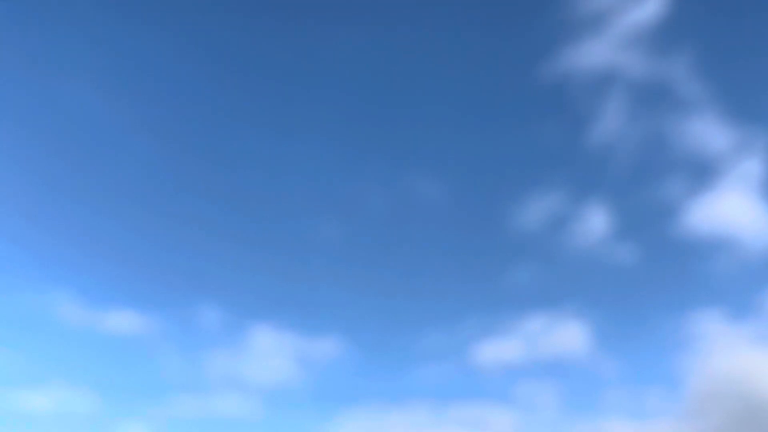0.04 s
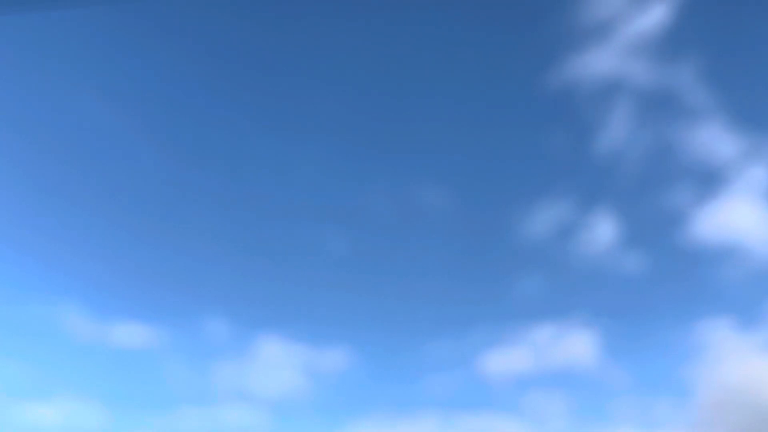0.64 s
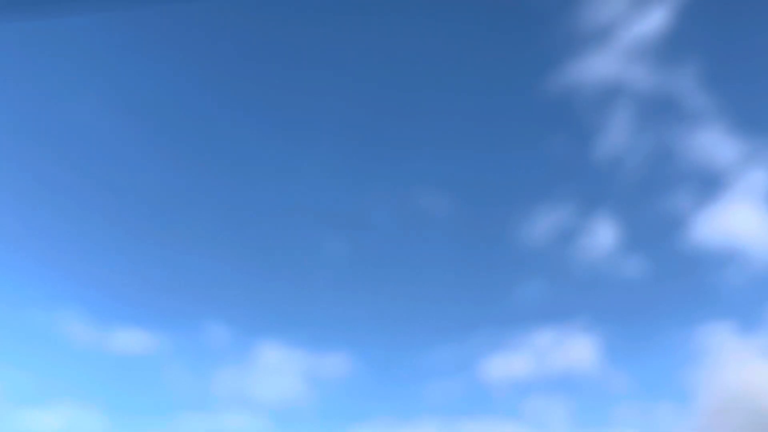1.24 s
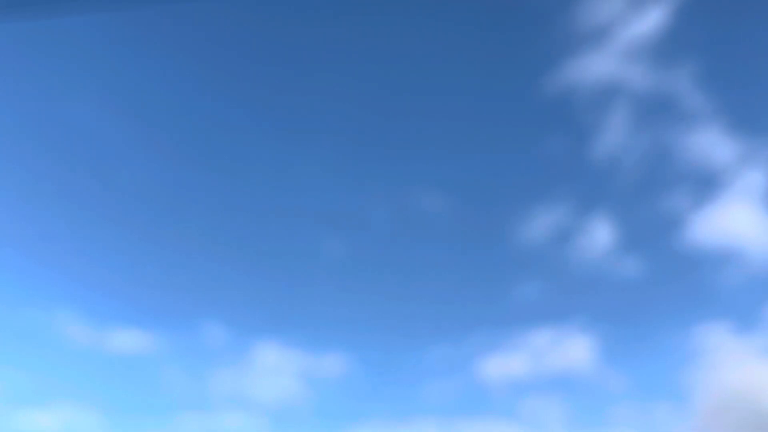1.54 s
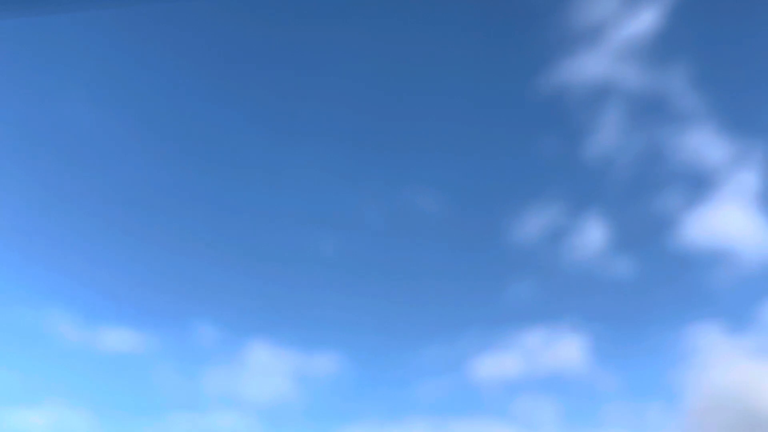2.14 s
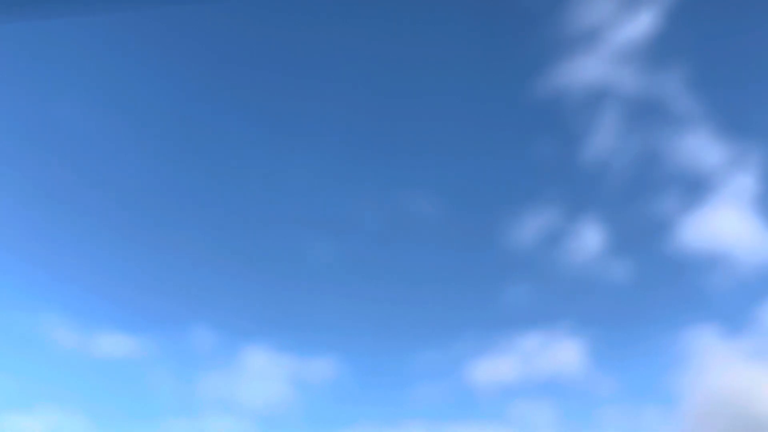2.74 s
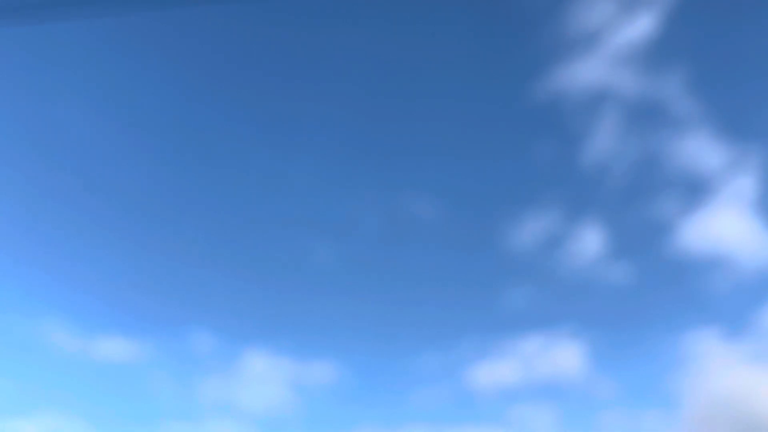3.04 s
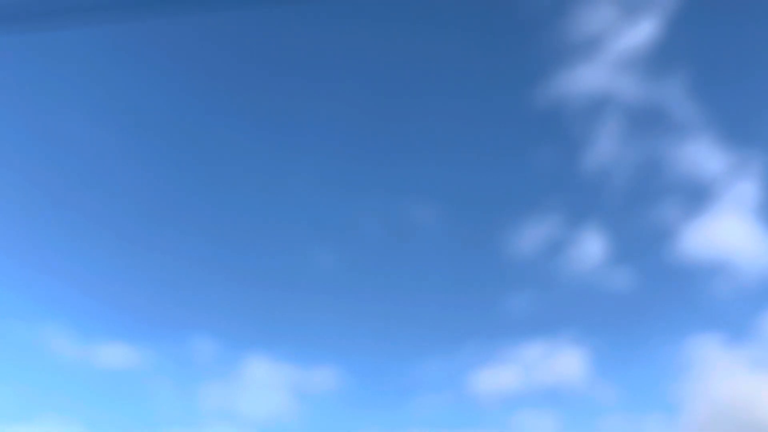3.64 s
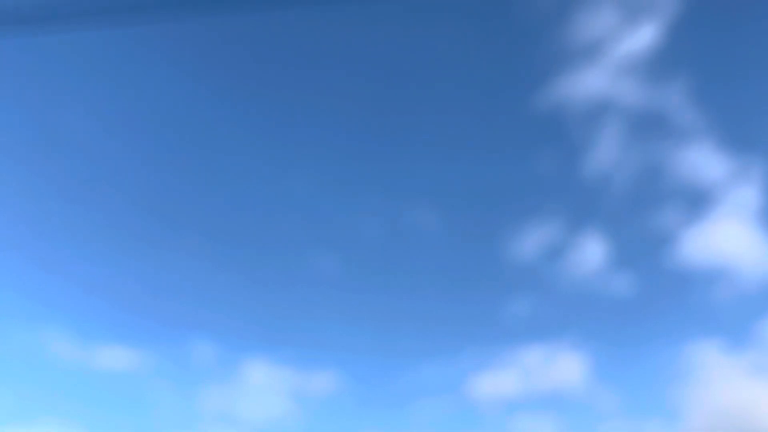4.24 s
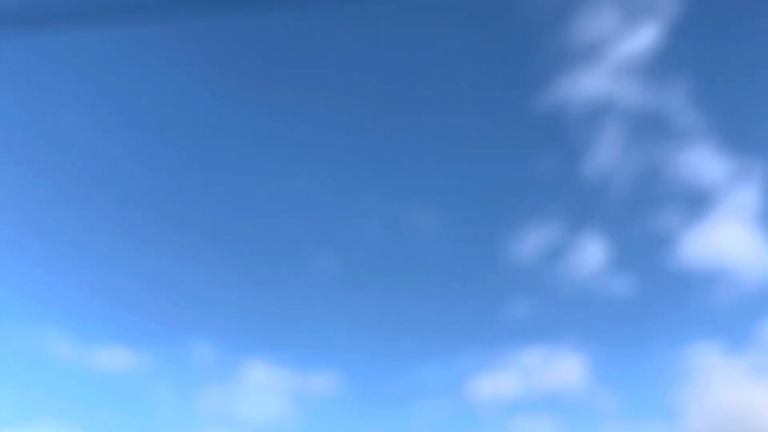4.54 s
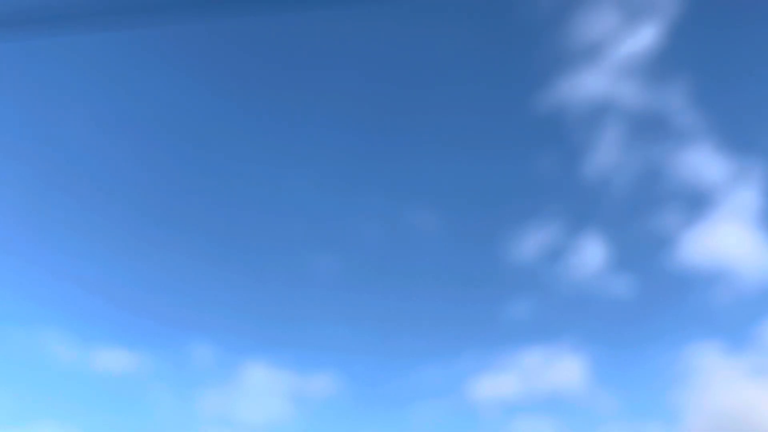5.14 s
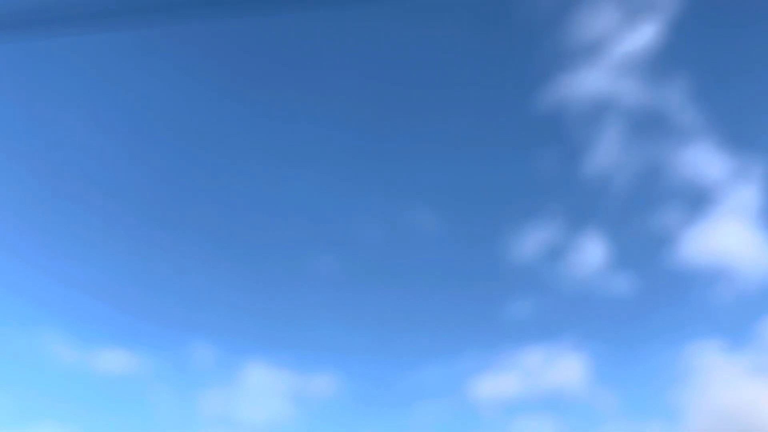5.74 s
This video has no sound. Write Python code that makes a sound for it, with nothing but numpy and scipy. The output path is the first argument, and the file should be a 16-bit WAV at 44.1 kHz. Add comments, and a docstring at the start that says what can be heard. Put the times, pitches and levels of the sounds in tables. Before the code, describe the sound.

A military jet roars high over open ground, heard from far below in stereo. It starts with a tearing rush over a deep, buffeting rumble, then grows quieter and duller as it draws away. In the second half the roar swells and brightens again, with a hollow, throbbing boom as the aircraft turns. Close to the microphones are a few faint rustles, small ticks and three barely audible bird peeps.

```python
"""Fighter jet high over open ground

Heard from a pair of microphones far below, the roar recedes, then swells as the exhaust swings round.
The plume's large eddies give a buffeting rumble and a hollow boom; its fine turbulence gives a tearing
roar whose treble the air soaks up with distance. Close by, over a faint outdoor hiss, there are
a few ticks and rustles, and a small bird calls three times."""
import sys
import numpy as np
from scipy import signal
from scipy.fft import rfft, irfft, next_fast_len
from scipy.io import wavfile
from scipy.ndimage import uniform_filter1d

SR = 44100
rng = np.random.default_rng(int(sys.argv[2]) if len(sys.argv) > 2 else 0)


def wav_record(signal):
    """Record a signal, one row per channel, as 16-bit PCM in the file named by sys.argv[1]."""
    frames = np.transpose(np.atleast_2d(signal))
    bounded = np.clip(frames, -1, 1)
    # unit amplitude maps onto the largest positive 16-bit level
    quanta = np.round(bounded * 32767).astype(np.int16)
    wavfile.write(sys.argv[1], SR, quanta)


N = 259749
TIME = np.arange(N) / SR
FFT_SIZE = next_fast_len(N, True)
BINS_HZ = np.maximum(np.arange(FFT_SIZE // 2 + 1) * SR / FFT_SIZE, 1)
MIC_SIDES = np.array([[1], [-1]])   # left, right

# Levels in the tables are relative: each source applies its own gain on top.
# how alike the scattered sound is at the two microphones: freq_hz, correlation
MIC_LIKENESS = [(40, .985), (100, .95), (200, .87), (310, .78), (400, .45), (520, .05), (800, -.1),
                (1300, -.15), (2200, 0), (8000, 0)]
# left microphone against right: freq_hz, balance_db
MIC_BALANCE = [(50, -1), (130, -1.5), (190, -2.5), (370, 0.5), (600, 0.5), (1000, 0.8), (1500, 2.5),
               (2200, 5.5), (2700, 0.5), (5000, 5), (7000, 3.5), (9000, -0.5)]
# how far the scattered sound leads at the left microphone: freq_hz, phase_rad
MIC_LEAD = [(60, 0.021), (170, 0.44), (310, .85), (600, .6), (1500, 0.56)]
# power that comes straight from the aircraft: freq_hz, share (0-1)
DIRECT_SHARE = [(300, .01), (600, .1), (900, .38), (1300, .48), (2000, .33), (2700, .18), (3300, .12),
                (4500, .25), (6000, .3)]
# echoes off surfaces near the microphones: delay_ms, level_db
NEARBY_ECHOES = [(7.9, -17.5), (10.8, -24), (18.6, -12.5), (27.4, -15), (43, -18.5)]

# spectrum of the outdoor hiss: freq_hz, level_db
AIR_SPECTRUM = [(100, -14), (1000, -3.5), (3500, -5.5), (4800, -5.5), (5700, -8), (6450, -6.5),
                (7500, -13.5), (8500, -14.5), (10000, -18.5), (12000, -33)]
# bird calls: start_s, length_s, top_pitch_hz, level_db
BIRD_CALLS = [(1.94, 0.059, 3600, -68.5), (2.962, .06, 3650, -76), (3.996, 0.085, 3620, -71)]
# soft rustles close by: centre_s, length_s, level_db
RUSTLE_EVENTS = [(0.006, .1, -50), (0.353, 0.12, -58), (3.06, 0.054, -74)]
# spectrum of a rustle: freq_hz, level_db
RUSTLE_SPECTRUM = [(2000, -5), (4000, -9.5), (5500, -14), (6300, -11.5), (7400, -26), (8300, -17.5),
                   (9500, -33)]
# small dry ticks close by: start_s, level_db
TICK_EVENTS = [(1.4626, -62), (1.6245, -66), (1.6985, -57), (1.7575, -61), (1.884, -68), (1.9555, -62),
               (5.643, -50), (5.654, -42)]
# resonances of the thing that ticks: freq_hz, width_hz, level_db
TICK_RESONANCES = [(4000, 640, 4), (6200, 320, 8), (8250, 450, -3.5)]

# spectrum of the very lowest rumble: freq_hz, level_db
DEEP_SPECTRUM = [(20, -24.5), (30, -15), (38, -2.5), (48, 0.5), (58, -10.5)]
# spectrum of the buffeting rumble: freq_hz, level_db
RUMBLE_SPECTRUM = [(22, -51), (32, -28), (42, -11), (52, -1.5), (68, 5), (82, 1.5), (98, 0), (118, -16.5),
                   (160, -41)]
# the largest eddies swell the low end: centre_s, length_s, rumble_lift_db, boom_lift_db
EDDY_BILLOWS = [(0.074, 0.1, -2, -0.5), (0.44, 0.088, 2, 6), (.54, 0.039, 6, 2.5), (0.893, 0.16, 3, 2.5),
                (1.321, 0.047, -6, 6), (1.506, 0.15, 3.5, -1), (1.73, 0.097, 3, 3), (2.928, 0.058, 4, 2),
                (3.702, 0.39, 4.5, 1.5), (4.018, 0.045, 8.5, -0.5), (4.22, 0.16, 4.5, 1),
                (4.967, 0.041, 7, -1), (5.413, 0.19, 3, 0)]
# low notes in the rumble: centre_s, length_s, pitch_hz, level_db
MOAN_NOTES = [(0.094, 0.1, 99, -19), (0.905, 0.084, 68, -22), (1.324, 0.052, 128, -22.5),
              (3.754, 0.22, 69, -33), (4.514, 0.28, 69.5, -23), (5.124, .14, 67, -26.5),
              (5.422, 0.3, 70, -21)]
# single heavy puffs of the plume: start_s, level_db
PLUME_PUFFS = [(0.01, -15.5), (0.055, -10.5), (0.083, -17), (0.445, -19.5), (0.535, -19), (0.632, -13),
               (0.9, -16), (1.183, -15), (1.297, -16), (1.396, -16), (1.461, -23), (3.782, -18),
               (4.028, -23), (5.487, -7)]
# resonances that shape a puff: freq_hz, width_hz, level_db
PUFF_RESONANCES = [(84, 57, -3), (124, 45, -5)]

# spectrum of the boom: freq_hz, level_db
BOOM_SPECTRUM = [(70, -41.5), (100, -9), (118, 0), (140, 1.5), (165, -1.5), (190, -1.5), (215, -7),
                 (255, -2.5), (295, -10.5), (380, -18)]
# the boom rings between ground and walls: freq_hz, width_hz, level_db
HOLLOW_RESONANCES = [(73.3, 2.5, -8), (140.2, 13, -4.5), (254.7, 7, -12.5)]
# the boom swells as the exhaust points at the microphones: time_s, level_db
EXHAUST_AIM = [(0, -19), (.22, -27), (.5, -27), (1.2, -28), (1.6, -33.5), (2.1, -33), (2.6, -36.5),
               (3.45, -34.5), (4.1, -30), (4.55, -21), (4.85, -20.5), (5.45, -15.5), (5.89, -20)]
# a drone in the boom climbs as the aircraft comes round: time_s, level_db, pitch_hz
BOOM_DRONE = [(2.0, -12, 165.2), (3.0, -7.5, 165), (4.25, -2, 171.9), (4.42, -2, 188), (4.55, 2.5, 187.8),
              (4.85, -5.5, 185.1), (4.95, -6, 171.8), (5.12, -1.5, 174.6), (5.35, 1.5, 179.9),
              (5.55, 2, 183.2), (5.89, -2, 187)]
# the upper boom opens, longest at the far end of the turn: centre_s, length_s, lift_db
BOOM_OPENINGS = [(1.15, 0.19, 7), (2.68, 0.65, 12.5), (3.55, 0.51, 2.5), (5.33, 0.19, 7.5), (5.72, 0.2, 3)]

# spectrum of the roar: freq_hz, level_db
ROAR_SPECTRUM = [(200, -34.5), (310, 2), (390, -1), (500, -1.6), (630, 0), (790, -4.5), (1040, -4.5),
                 (1300, -10), (1900, -15), (2450, -18.5), (3100, -28.5), (4400, -34), (5500, -43.5),
                 (6250, -40.5), (7300, -55), (10000, -63)]
# the roar as the jet draws away and returns: time_s, level_db, air_loss_db (at 2.4 kHz), treble_lift_db
FLIGHT_PATH = [(0, -21, -0.5, 4.5), (.17, -25.5, 1.4, 2), (.35, -25.5, 1.5, 3.5), (.6, -26.5, 2, 1),
               (.88, -28, 3, 3.5), (1.35, -29.5, 7, 3.5), (1.9, -35, 9.5, 3), (2.28, -35.5, 12.5, 5),
               (2.55, -34.5, 12.5, 5.5), (3.1, -33, 12, 3), (4.1, -31, 9, 0), (4.6, -28.5, 5.5, 0.5),
               (4.95, -27, 5.5, 2), (5.2, -26, 3, 2), (5.52, -24, 1.55, 2.5), (5.89, -24, 2.5, 2.5)]
# the roar surges as the air on its path shifts: centre_s, length_s, lift_db
ROAR_SURGES = [(.05, 0.12, -1.5), (.27, 0.13, 1.5), (.86, 0.12, 0.5), (2.55, 0.25, 1.5), (3.07, 0.14, 1.2),
               (5.53, 0.078, 0.9)]
# churning bands of the roar: centre_hz
CHURN_BANDS = [340, 527, 784]
# hollow colours roll through the roar: centre_s, length_s, lift_db, centre_hz
ROAR_ROLLS = [(.25, .45, 1.5, 323), (0.967, 0.22, 2.5, 1034), (1.278, 0.19, 1, 510), (3.1, 0.14, 4, 1000),
              (3.45, 0.32, 0.5, 1010), (3.68, 0.53, 1, 608.2), (5.253, 0.44, 6, 419), (5.524, 0.16, 7, 720),
              (5.53, 0.21, -0.5, 1000), (5.794, .2, 0.5, 660)]


def from_db(db):
    """Decibels to gain."""
    return 10 ** (np.asarray(db) / 20)


def unit_power(x):
    """Scale to an RMS of 1."""
    return x / np.sqrt(np.mean(x ** 2) + 1e-20)


def in_time(rows):
    """Each column of a curve at every sample."""
    times, *columns = np.transpose(rows)
    return [np.interp(TIME, times, column) for column in columns]


def at_hz(points, hz=BINS_HZ):
    """Read a table on a log-frequency axis."""
    freqs, values = np.transpose(points)
    return np.interp(np.log(hz), np.log(freqs), values)


def hump(centre_s, length_s):
    """A smooth rise and fall of height 1."""
    return np.exp(-(2 * (TIME - centre_s) / length_s) ** 2)


def swells(rows):
    """The summed lift in dB of rows of centre_s, length_s, lift_db."""
    return sum(db * hump(s, length) for s, length, db in rows)


def strikes(events):
    """One click per row of start_s, level_db."""
    clicks = np.zeros(N)
    for s, db in events:
        clicks[round(s * SR)] = from_db(db)
    return clicks


def drift(rate_hz, step=16):
    """A smooth random wander with an RMS of 1, mostly slower than rate_hz."""
    count = next_fast_len(N // step + 2, True)
    hz = np.arange(count // 2 + 1) * SR / step / count
    slow = irfft(rfft(rng.standard_normal(count)) / (1 + (hz / rate_hz) ** 2), count)
    return unit_power(np.interp(np.arange(N) / step, np.arange(count), slow))


def colour(spectrum):
    """Gain per frequency, falling steeply beyond the ends of the spectrum."""
    skirts = np.minimum(BINS_HZ / spectrum[0][0], 1) * np.minimum(spectrum[-1][0] / BINS_HZ, 1)
    return from_db(at_hz(spectrum)) * skirts ** 5


def resonances(modes):
    """Complex gain per frequency of parallel resonances: freq_hz, width_hz, level_db."""
    return sum(from_db(db) / (1 + 1j * (BINS_HZ - hz ** 2 / BINS_HZ) / width) for hz, width, db in modes)


def filtered(x, gain):
    """Apply a gain per frequency."""
    return irfft(rfft(x, FFT_SIZE) * gain, FFT_SIZE)[..., :N]


def band(x, hz, q):
    """One resonant band, hz / q wide."""
    return filtered(x, resonances([(hz, hz / q, 0)]))


def low_cut(x, hz):
    """Steep high-pass."""
    return signal.sosfilt(signal.butter(4, hz, "high", fs=SR, output="sos"), x)


def tilted(x, upper_db, split_hz):
    """Raise or lower everything above a split frequency, moment by moment."""
    low = filtered(x, 1 / (1 + (BINS_HZ / split_hz) ** 8))
    return low + from_db(upper_db) * (x - low)


def steadied(x, samples):
    """Even out the slow swells of a noise and keep its fast buffeting."""
    power = np.mean(x ** 2, axis=0)
    slow_power = uniform_filter1d(uniform_filter1d(power, samples), samples)
    return x / np.sqrt(slow_power + 1e-12)


def mic_gains(hz=BINS_HZ):
    """Gain at the left and right microphones."""
    return from_db(MIC_SIDES * at_hz(MIC_BALANCE, hz) / 2)


def outdoor_noise(gain, left_lag_s=0.00042):
    """Noise at both microphones: a direct wave from the right, plus scatter from the surroundings."""
    direct, mid, side = rfft(rng.standard_normal((3, FFT_SIZE)))
    share, alike = at_hz(DIRECT_SHARE), at_hz(MIC_LIKENESS)
    direct = np.sqrt(share) * direct * np.exp(-2j * np.pi * BINS_HZ * MIC_SIDES * left_lag_s / 2)
    scattered = np.sqrt((1 + alike) / 2) * mid + np.sqrt((1 - alike) / 2) * side * MIC_SIDES
    scattered = np.sqrt(1 - share) * scattered * np.exp(1j * MIC_SIDES * at_hz(MIC_LEAD) / 2)
    return unit_power(irfft((direct + scattered) * gain * mic_gains(), FFT_SIZE)[:, :N])


def open_air(level_db=-71.5):
    """The faint hiss of open ground; its level and treble flicker slightly."""
    gain = from_db(level_db + .4 * drift(15))
    hiss = outdoor_noise(colour(AIR_SPECTRUM))
    return gain * tilted(hiss, .8 * drift(12), split_hz=4800)


def bird(bend=.085):
    """A small bird nearby: thin, slightly rough peeps that arch up to their top pitch."""
    calls = np.zeros(N)
    quaver = .014 * drift(300)
    for s, length, top_hz, db in BIRD_CALLS:
        progress = np.clip((TIME - s) / length, 0, 1)
        pitch_hz = top_hz * (1 - bend * (progress / .55 - 1) ** 2 + quaver)
        calls += from_db(db) * np.sin(np.pi * progress) * np.sin(2 * np.pi * np.cumsum(pitch_hz) / SR)
    return calls


def rustles(grain_db=2.5):
    """Short grainy swishes close to the microphones."""
    envelope = sum(from_db(db) * hump(s, length) for s, length, db in RUSTLE_EVENTS)
    return envelope * from_db(grain_db * drift(120)) * outdoor_noise(colour(RUSTLE_SPECTRUM))


def ticks(gain_db=13.0, scuff_db=-14, scuff_s=0.0024):
    """Close by, a contact and a brief scuff ring a small hard thing for a few milliseconds."""
    clicks = strikes(TICK_EVENTS)
    decays = signal.lfilter([1], [1, -np.exp(-1 / (scuff_s * SR))], clicks + 1e-18)
    scuffs = from_db(scuff_db) * decays * rng.standard_normal(N)
    ringing = sum((-1) ** k * resonances([mode]) for k, mode in enumerate(TICK_RESONANCES))
    return from_db(gain_db) * filtered(clicks + scuffs, ringing)


def deep_rumble(level_db=-43):
    """The very lowest rumble carries evenly to the ground, whichever way the exhaust points."""
    return from_db(level_db) * steadied(outdoor_noise(colour(DEEP_SPECTRUM)), samples=8000)


def moans(waver_hz=1.72):
    """Now and then the rumble gathers into one low, wavering note."""
    notes = 0
    for s, length, hz, db in MOAN_NOTES:
        phase = 2 * np.pi * (rng.random() + np.cumsum(hz + waver_hz * drift(8.6)) / SR)
        notes = notes + from_db(db) * mic_gains(hz) * hump(s, length) * unit_power(np.sin(phase))
    return notes


def thumps(gain_db=-1.5, soft_hz=170):
    """A heavy eddy reaches the microphones as a soft pressure pulse of a cycle or two."""
    body = resonances(PUFF_RESONANCES) / (1 + 1j * BINS_HZ / soft_hz) ** 3
    body /= np.abs(irfft(body, FFT_SIZE)).max()
    pulses = filtered(strikes(PLUME_PUFFS), body)
    return from_db(gain_db) * mic_gains(100) * low_cut(pulses, hz=42)


def rumble(aim_db, air_loss_db, base_db=-29.5, buffet_db=0.5):
    """The plume's large eddies arrive in lumps, deepest while the aircraft is far off."""
    lift_db = 2.5 - 0.93 * air_loss_db
    eddies = outdoor_noise(colour(RUMBLE_SPECTRUM))
    eddies = tilted(eddies, lift_db, split_hz=140)
    eddies = tilted(eddies, lift_db, split_hz=51)
    billow_db = swells((s, length, db) for s, length, db, _ in EDDY_BILLOWS)
    level_db = base_db + .3 * aim_db + billow_db + buffet_db * drift(12)
    return low_cut(from_db(level_db) * steadied(eddies, samples=3000), hz=44)


def drone(waver_hz=0.9, throb_db=3.4):
    """A throbbing note in the boom that climbs as the aircraft comes round."""
    level_db, pitch_hz = in_time(BOOM_DRONE)
    phase = 2 * np.pi * np.cumsum(pitch_hz + waver_hz * drift(12)) / SR
    tone = np.sin(phase + MIC_SIDES * at_hz(MIC_LEAD, pitch_hz) / 2) * mic_gains(pitch_hz)
    return from_db(level_db) * unit_power(tone * from_db(throb_db * drift(19)))


def boom(boom_db, aim_db, surge_db=0.95):
    """The boom rings hollow and gathers into a drone when the exhaust points at the microphones."""
    low_band = np.abs(resonances([(122, 310, 0)])) ** 2
    hollow = from_db(-11 + 0.71 * aim_db) * outdoor_noise(resonances(HOLLOW_RESONANCES) * low_band)
    blend = hollow + drone() + outdoor_noise(colour(BOOM_SPECTRUM))
    upper_db = -2.5 - 0.13 * aim_db + swells(BOOM_OPENINGS)
    blend = steadied(tilted(blend, upper_db, split_hz=215), samples=3000)
    billow_db = swells((s, length, db) for s, length, _, db in EDDY_BILLOWS)
    return from_db(boom_db + billow_db + surge_db * drift(6.7)) * blend


def echoed(x, sway=.035, sway_hz=0.46):
    """Nearby surfaces add echoes whose delays slide as the aircraft moves."""
    heard = x
    for ms, db in NEARBY_ECHOES:
        sent_s = TIME - ms / 1000 * (1 + sway * drift(sway_hz))
        heard = heard + from_db(db) * np.array([np.interp(sent_s, TIME, channel) for channel in x])
    return heard


def churned(x, depth_db=0.77, churn_hz=9):
    """Turbulence makes each part of the roar's body swell and sag on its own."""
    return x + sum((from_db(depth_db * drift(churn_hz)) - 1) * band(x, hz, q=3) for hz in CHURN_BANDS)


def rolled(x):
    """Shifting paths through the air reinforce one narrow band after another."""
    return x + sum((from_db(db * hump(s, length)) - 1) * band(x, hz, q=6.8)
                   for s, length, db, hz in ROAR_ROLLS)


def through_air(x, loss_db, steepness=1.91):
    """Air absorption: loss_db at 2.4 kHz, growing as a power of frequency up to 6 kHz."""
    hz, frame_s, frames = signal.stft(x, SR, nperseg=512, boundary="even")
    loss_scale = (np.minimum(hz, 6000) / 2400)[:, None] ** steepness
    gain = from_db(-loss_scale * np.interp(frame_s, TIME, loss_db))
    return signal.istft(frames * gain, SR)[1][:, :N]


def roar(roar_db, air_loss_db, treble_db, trim_db=-1.31, flutter_db=0.59, tear_db=0.23):
    """Fine turbulence tears, flutters and surges; the farther off the jet, the duller it arrives."""
    noise = echoed(outdoor_noise(colour(ROAR_SPECTRUM)))
    noise = tilted(noise, 0.079 * air_loss_db, split_hz=720)   # distance thins the body a little
    noise = steadied(noise, samples=8000)
    noise = tilted(noise, treble_db + tear_db * drift(24), split_hz=1100)
    noise = through_air(rolled(churned(noise)), np.maximum(air_loss_db, 0))
    return from_db(roar_db + trim_db + swells(ROAR_SURGES) + flutter_db * drift(30)) * noise


def scene(usual_boom_db=-30.5):
    """The distant jet over the outdoor hiss and the small sounds near the microphones."""
    roar_db, air_loss_db, treble_db = in_time(FLIGHT_PATH)
    boom_db = in_time(EXHAUST_AIM)[0]
    aim_db = boom_db - usual_boom_db   # rises as the exhaust swings this way
    low_end = deep_rumble() + rumble(aim_db, air_loss_db) + moans() + thumps()
    jet = low_end + boom(boom_db, aim_db) + roar(roar_db, air_loss_db, treble_db)
    return jet + open_air() + ticks() + rustles() + bird()


def record(dry, leak_db=-59, leak_hz=9600, fade_s=.004, cutoff_hz=11000):
    """The recorder leaks a faint high image of the boom; the ends fade briefly and the top is cut."""
    boom_band = filtered(dry, np.abs(resonances([(199, 230, 0.0049)])))
    leak = from_db(leak_db) * boom_band * np.cos(2 * np.pi * leak_hz * TIME)
    fade = np.minimum(np.minimum(TIME, TIME[::-1]) / fade_s, 1)
    high_cut = signal.cheby2(12, 60, cutoff_hz, fs=SR, output="sos")
    return signal.sosfilt(high_cut, (dry + leak) * fade)


dry = scene()
out = record(dry)
wav_record(out)
```